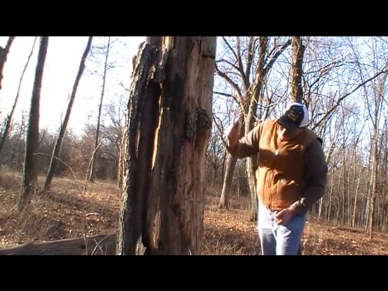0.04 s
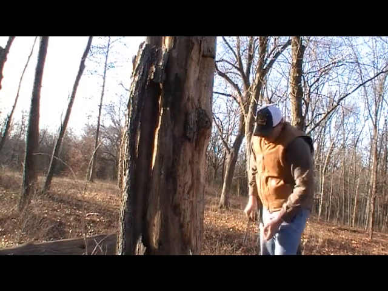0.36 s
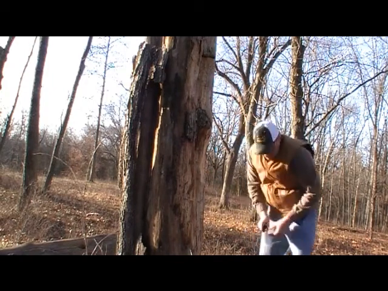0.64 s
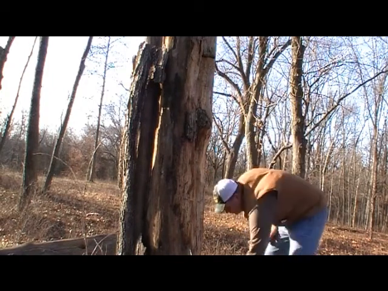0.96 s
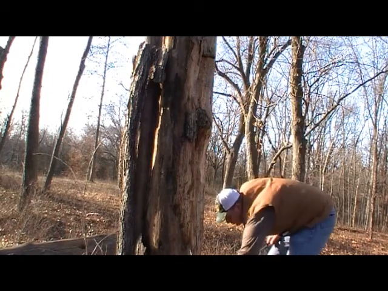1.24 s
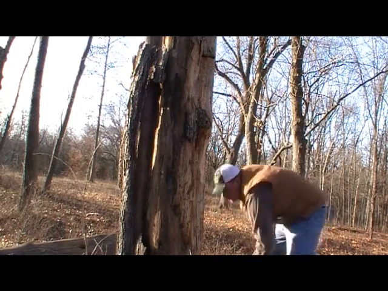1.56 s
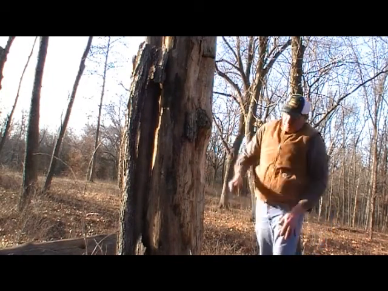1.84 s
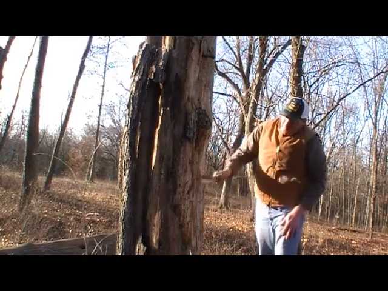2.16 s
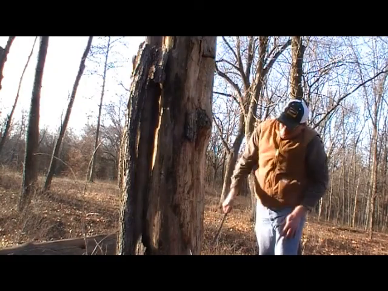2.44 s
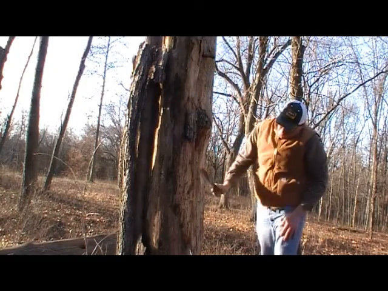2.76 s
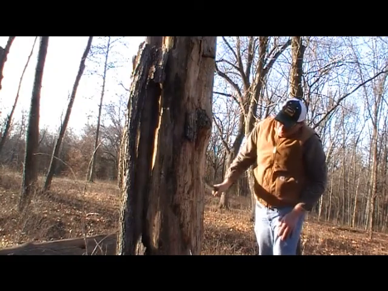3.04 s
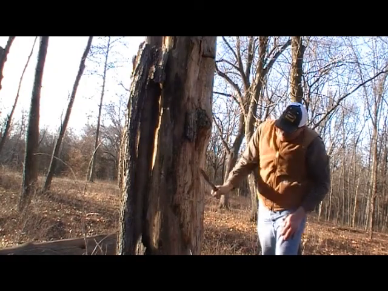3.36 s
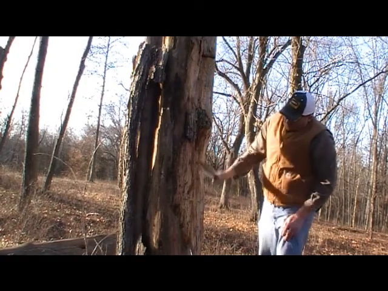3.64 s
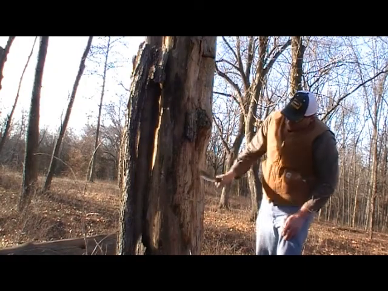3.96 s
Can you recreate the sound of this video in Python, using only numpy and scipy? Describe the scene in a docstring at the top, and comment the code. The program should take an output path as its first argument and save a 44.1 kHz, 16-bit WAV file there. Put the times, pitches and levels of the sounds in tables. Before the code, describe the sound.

Dry wood cracks under quick chipping strikes, while wind flutters on the microphone.

```python
"""A quiet wood. A man chips at a dead trunk: dry, sharp blows, each a crack and a short crunch of fibres.
He stoops to rummage in dry leaves, then strikes on at about seven blows a second. Twigs and chips tick.
Wind flutters and puffs on the microphone ports; a faint, far whine sinks over a steady hush.
The gain control ducks after hard blows."""
import sys
import numpy as np
from scipy import signal
from scipy.fft import rfft, irfft, next_fast_len
from scipy.io import wavfile
from scipy.ndimage import map_coordinates

SR = 44100
rng = np.random.default_rng(int(sys.argv[2]) if len(sys.argv) > 2 else 0)


def dump_mix(stems):
    """Bounce the given channels to the path in sys.argv[1] as a 16-bit WAV at rate SR."""
    frames = np.atleast_2d(stems).T  # one column per channel
    limited = np.clip(frames, -1, 1)  # hard clip at full scale
    pcm = np.round(limited * 32767).astype(np.int16)
    wavfile.write(sys.argv[1], SR, pcm)


N = 176400

# Each row: start in seconds, level in dB, knock in dB, knock ring in Hz, splinter ring in Hz,
# splinter in dB, crunch in dB, seconds for the crunch to fall 30 dB, thump in dB, left over right in dB.
TRUNK_BLOWS = [(.1546, -4, 3.5, 1440, 3150, 8, 4.5, 0.0097, -30, 1),
               (0.1646, -9.5, 3, 1420, 6600, 2, 1, 0.024, -34, 2),
               (.187, -15, 5.5, 1800, 3400, 3, 7.5, 0.02, -30, 1.5),
               (0.2583, -7, -1, 1380, 5100, -5, 4.5, 0.0034, -24, -3),
               (2.0143, 5, -0.5, 1100, 5270, 5, -10.5, 0.011, -30, 2.5),
               (2.1765, 0.5, 0.5, 1200, 4440, 7, 2.5, 0.0043, -28, 3),
               (2.1804, -9, 6, 1060, 4300, 7, 4, 0.0067, -26, -1),
               (2.3413, 1, 0.5, 1510, 7050, -8, -4.5, 0.0082, -15, 2),
               (2.4943, -1.5, -4, 1460, 5600, -7, 2, 0.0068, -23, 3),
               (2.505, -11.5, 4, 1210, 5700, -10, 1, 0.0059, -30, -2),
               (2.6093, -6.5, 3.5, 1660, 6800, -6, -10, 0.007, -19, -2),
               (2.8330, 0.5, -9, 1330, 4080, 1, 0.5, 0.0033, -21.5, 2),
               (2.9740, 6, 0, 1630, 4150, 2.5, 1.5, 0.0089, -28, 2),
               (3.1082, 7, -3, 1380, 6300, 2.5, -8, 0.013, -34, 3),
               (3.2575, -6.5, -0.5, 1100, 8040, -24, 7.5, 0.0093, -12, 2),
               (3.4218, 6.5, -5.5, 2250, 6600, 6, -12.5, 0.0033, -32, 3),
               (3.5698, 2, -0.5, 1250, 6850, -4, -1.5, 0.0058, -32, 2.5),
               (3.7193, -15.5, 8.5, 1450, 9500, 7, 9.5, 0.0058, -25, 5),
               (3.7228, -10, 4, 1250, 6300, -25, 5, 0.0058, -12, 2.5),
               (3.8545, -0.5, -2.5, 1400, 7200, -1, -9.5, 0.0057, -28, 5),
               (3.9973, -7.5, 4.5, 1380, 4470, 2, 7.5, 0.0039, -17.5, 0.5)]


def blows():
    """Each blow cracks the wood and thumps dully into the trunk; fibres crunch for some milliseconds."""
    thump_hz, thump_t60_s, trim_db = 330, 0.027, -2.5
    out, t = np.zeros((2, N)), np.arange(2048) / SR
    thump = unit_energy(np.sin(2 * np.pi * thump_hz * t) * amp(-60 * t / thump_t60_s))
    impulse = 1. * (t == 0)
    for start_s, level_db, *spot, crunch_db, decay_s, thump_db, pan_db in TRUNK_BLOWS:
        crack = wood(impulse, *spot) + amp(thump_db) * thump
        fibres = grains((2, len(t)), spread=1) * amp(-30 * t / decay_s) * (1 - np.exp(-t / 0.00038))
        crunch = stereo(wood(fibres, *spot), side_db=-10, pan_db=pan_db)
        blow = crack * amp([[pan_db / 2], [-pan_db / 2]]) + amp(crunch_db) * crunch
        add(out, start_s, amp(level_db + trim_db) * blow)
    return out


# Each row: mode frequency in Hz, width in Hz, level in dB.
WOOD_MODES = [(1100, 170, -15), (1484, 172, -4.5), (2344, 670, -1.5), (3150, 1800, -14.5),
              (4150, 900, -3.5), (5180, 480, -7), (6300, 1090, 4), (8280, 840, -0.5), (9080, 270, -2.5)]


def wood(force, knock_db, knock_hz, splinter_hz, splinter_db):
    """A force rings the trunk's modes and two rings of the spot struck. Output has energy 1."""
    knock_below_hz, knock_ring_db = 3000, 4.5

    def response(f):
        body = sum(amp(db + knock_db * (hz < knock_below_hz)) * resonance(f, hz, width_hz)
                   for hz, width_hz, db in WOOD_MODES)
        knock = 1 + amp(knock_ring_db + knock_db / 2) * resonance(f, knock_hz, width_hz=220)
        splinter = 1 + amp(splinter_db) * resonance(f, splinter_hz, width_hz=650)
        return body * knock * splinter
    return unit_energy(filtered(force, response))


# Each row: start in seconds, level in dB.
TWIG_TICKS = [(.129, -23), (.136, -17.5), (0.144, -17), (0.2, -17.5), (.285, -15.5), (0.335, -18),
              (.347, -18), (0.361, -22), (0.729, -14), (.748, -14.5), (1.767, -17), (1.788, -19),
              (1.872, -22), (2.222, -16.5), (2.469, -21), (2.953, -19.5), (3.075, -16.5), (3.205, -20),
              (3.377, -15), (3.554, -11)]
# Spectrum of dry twigs and leaves. Each row: frequency in Hz, relative level in dB.
LITTER_SPECTRUM = [(300, -65), (900, -8), (1600, -5), (3500, -3.5), (6000, 0.5), (9000, 2), (11000, -5.5),
                   (13000, -22)]


def ticks():
    """Twigs and falling chips give tiny dry snaps, each with a short crackle."""
    out, t = np.zeros((2, N)), np.arange(1024) / SR
    click = amp(-7.5) * unit_rms(1. * (t == 0))
    for start_s, level_db in TWIG_TICKS:
        crackle = unit_rms(grains((2, len(t)), spread=0.17) * amp(-30 * t / 0.0067))
        snap = unit_energy(coloured(crackle + click, LITTER_SPECTRUM))
        add(out, start_s, amp(level_db) * stereo(snap, side_db=-9, pan_db=0.33))
    return out


# Each row: peak time in seconds, level in dB, 10 dB rise in seconds, 10 dB fall in seconds.
LEAF_STROKES = [(.155, -55, 0.021, 0.036), (.305, -47, 0.042, 0.037), (.665, -40.5, 0.029, 0.046),
                (.73, -39, 0.046, 0.031), (.80, -49.5, 0.063, 0.046), (1.148, -41, 0.014, 0.028),
                (1.205, -49.5, 0.016, 0.069), (1.46, -60, 0.027, 0.027), (1.70, -48, .05, 0.068),
                (1.765, -41, 0.037, 0.033), (2.265, -41, 0.016, 0.02), (2.63, -48.5, 0.028, 0.025),
                (2.69, -51.5, 0.034, .03), (3.24, -53.5, 0.033, 0.046), (3.38, -44.5, 0.032, 0.026),
                (3.97, -47, 0.015, 0.025)]
# Each row: peak time in seconds, level in dB, 10 dB rise in seconds, 10 dB fall in seconds.
SCUFF_STROKES = [(1.36, -54.5, 0.19, 0.06), (2.95, -51.5, 0.024, 0.051), (3.18, -50, 0.16, 0.14),
                 (3.65, -50.5, 0.18, 0.16)]
# Each row: frequency in Hz, relative level in dB.
SCUFF_SPECTRUM = [(800, -28), (2200, -4), (3500, 0), (4700, -12), (9000, -20)]


def rustles():
    """Dry leaves and clothing crackle in strokes; the softer scuffs are duller."""
    leaves = stereo(coloured(grains((2, N), spread=0.55), LITTER_SPECTRUM), side_db=-12.5, pan_db=0.17)
    leaves *= amp(3.5 * wobble(rate_hz=260))
    scuffs = stereo(coloured(grains((2, N), spread=0.96), SCUFF_SPECTRUM), side_db=-7, pan_db=0)
    return leaves * swells(LEAF_STROKES) + scuffs * swells(SCUFF_STROKES)


# Each row: time in seconds, wind strength in dB.
WIND_STRENGTH = [(0, -65), (.13, -43), (.2, -44), (.33, -43), (.6, -50), (.7, -36.5), (.93, -35),
                 (1.03, -38.5), (1.15, -30.5), (1.21, -35.5), (1.34, -31.5), (1.48, -36.5), (1.58, -33),
                 (1.68, -44.5), (1.84, -45.5), (1.92, -32.5), (2.0, -43), (2.1, -35), (2.18, -42.5),
                 (2.3, -33.5), (2.44, -36.5), (2.53, -50), (2.61, -38), (2.68, -45.5), (2.78, -39),
                 (2.87, -59), (3.02, -49), (3.1, -35.5), (3.38, -40.5), (3.45, -57), (3.6, -58.5),
                 (3.73, -34), (3.8, -40.5), (3.94, -36), (4, -54)]
# Each row: frequency in Hz, relative level in dB.
FLUTTER_SPECTRUM = [(25, -27), (60, -21.5), (130, -8.5), (230, 0.5), (380, -1.5), (600, -6), (1000, -23),
                    (2000, -41), (5000, -51)]


def wind():
    """Eddies push the two microphone ports in opposite senses, harder as the wind grows."""
    reference_db, eddy_db, flutter_db, growth_db_per_db = -30, 1.6, -30.5, 0.83
    gust_db = curves(WIND_STRENGTH)[0] - reference_db + eddy_db * wobble(rate_hz=78)
    air = coloured(rng.standard_normal((2, N)), FLUTTER_SPECTRUM)
    return stereo(air, side_db=12.83, pan_db=-1.04) * amp(flutter_db + growth_db_per_db * gust_db)


# Each row: peak time in seconds, level in dB, seconds from peak to 10 dB down, centre in Hz.
WIND_BUFFETS = [(0.264, -30, 0.019, 490), (0.294, -26, 0.017, 506), (0.793, -27.5, .012, 370),
                (0.846, -29, 0.026, 403), (1.102, -25, 0.0098, 380), (1.161, -25.5, .025, 650),
                (1.263, -20.5, 0.0084, 520), (1.286, -17, 0.013, 536), (1.32, -22.5, 0.019, 574),
                (1.383, -31, 0.028, 390), (1.431, -31, 0.0097, 575), (1.888, -27, 0.013, 450),
                (1.931, -32.5, 0.017, 537), (2.133, -28, 0.014, 287), (2.244, -31.5, 0.013, 387),
                (2.396, -27, 0.0051, 450), (2.472, -34, 0.022, 330), (2.72, -26.5, 0.01, 396),
                (3.254, -25.5, 0.0074, 494), (3.406, -30, 0.0061, 324), (3.844, -23, .012, 330),
                (3.898, -24.5, 0.0038, 390)]
# Each row: multiple of the centre frequency, relative level in dB.
BUFFET_SPECTRUM = [(.1, -54), (.3, -18.5), (.65, -9), (1, -0.5), (1.35, -7), (2, -17.5), (3.2, -29),
                   (6, -67), (20, -78)]


def buffets():
    """Single eddies hit the ports as short, hollow puffs."""
    out, t = np.zeros((2, N)), np.arange(-4096, 4096) / SR
    for peak_s, level_db, half_width_s, centre_hz in WIND_BUFFETS:
        envelope = amp(-10 * np.abs(t / half_width_s) ** 1.47)
        spectrum = [(multiple * centre_hz, db) for multiple, db in BUFFET_SPECTRUM]
        air = coloured(rng.standard_normal((2, len(t))), spectrum)
        puff = np.array([unit_rms(noise * envelope) for noise in air]) * np.sqrt(np.mean(envelope ** 2))
        add(out, peak_s + t[0], amp(level_db + 1.5) * stereo(puff, side_db=14, pan_db=-2.63))
    return out


# Each row: frequency in Hz, relative level in dB.
HUSH_SPECTRUM = [(25, -5), (70, -9), (130, 5.5), (220, 13.5), (380, 15.5), (650, 6.5), (1000, 4.5),
                 (2500, 3), (5000, 0.5), (9000, 0.5), (10500, -3), (12000, -22.5)]


def hush():
    """The steady hush of the wood, wavering slightly in level."""
    air = stereo(coloured(rng.standard_normal((2, N)), HUSH_SPECTRUM), side_db=0, pan_db=0)
    return air * amp(-48.5 + 0.71 * wobble(rate_hz=2.22))


# Each row: time in seconds, pitch in Hz, rms level in dB.
WHINE_PATH = [(2.4, 592, -69), (2.8, 590, -61.5), (3.3, 588, -58), (3.7, 583, -55), (4.0, 573, -57)]


def whine():
    """A faint, sinking tone, as of far tyres."""
    pitch_hz, level_db = curves(WHINE_PATH)
    gain = amp(level_db + 1.45 * wobble(rate_hz=10))
    phase = 2 * np.pi * np.cumsum(pitch_hz + 3 * wobble(rate_hz=30)) / SR
    return gain * np.sqrt(2) * np.sin(phase)


def tree_scatter(direct, wet_db, t60_s):
    """The ground and nearby trunks add a thin tail of reflections."""
    t = np.arange(SR // 3) / SR
    tail = unit_energy(grains((2, len(t)), spread=1) * amp(-60 * t / t60_s) * (1 - np.exp(-t / 0.006)))
    return direct + amp(wet_db) * signal.fftconvolve(direct, tail, axes=1)[:, :N]


def amp(db):
    """Decibels to gain."""
    return 10 ** (np.asarray(db) / 20)


def unit_rms(x):
    """Scale to rms 1."""
    return x / np.sqrt(np.mean(x ** 2) + 1e-20)


def unit_energy(x):
    """Scale to a mean energy of 1 per channel."""
    return unit_rms(x) / np.sqrt(x.shape[-1])


def resonance(f, hz, width_hz):
    """Response of one ringing mode."""
    return 1j * f * width_hz / (hz * hz - f * f + 1j * f * width_hz)


def filtered(x, response):
    """Apply a response given as a function of Hz."""
    n = x.shape[-1]
    padded = next_fast_len(n + 8192)
    return irfft(rfft(x, padded) * response(np.fft.rfftfreq(padded, 1 / SR)), padded)[..., :n]


def coloured(x, spectrum):
    """Shape x by (Hz, dB) points, at rms 1."""
    hz, db = np.transpose(spectrum)
    return unit_rms(filtered(x, lambda f: amp(np.interp(np.log(f + 1), np.log(hz), db))))


def curves(rows):
    """One value per sample for each column after the time."""
    times_s, *columns = np.transpose(rows)
    return [np.interp(np.arange(N) / SR, times_s, column) for column in columns]


def swells(strokes):
    """Gain of overlapping strokes that rise and fall, summed in power."""
    t, power = np.arange(N) / SR, np.zeros(N)
    for peak_s, level_db, rise_s, fall_s in strokes:
        distance = np.abs(t - peak_s) / np.where(t < peak_s, rise_s, fall_s)
        power += amp(level_db - 10 * distance ** 2.08) ** 2
    return np.sqrt(power)


def wobble(rate_hz):
    """A smooth random curve with rate_hz knots a second."""
    return map_coordinates(rng.standard_normal(4096), [np.arange(N) * rate_hz / SR], mode="wrap")


def grains(shape, spread):
    """Noise whose samples vary widely in size, like tiny fractures."""
    return rng.standard_normal(shape) * np.exp(spread * rng.standard_normal(shape))


def stereo(pair, side_db, pan_db):
    """Left and right from a shared and an opposed signal; positive pan is left."""
    mid, side = pair[0], amp(side_db) * pair[1]
    left, right = (mid + side) * amp(pan_db / 2), (mid - side) * amp(-pan_db / 2)
    return np.array([left, right]) / np.sqrt(1 + amp(side_db) ** 2)


def add(out, start_s, sound):
    """Mix a sound in at start_s."""
    i = round(start_s * SR)
    out[:, i:i + sound.shape[1]] += sound[:, :max(N - i, 0)]


def scene():
    """Blows and ticks among the trees, with rustles, wind, hush and whine."""
    impacts = tree_scatter(blows() + ticks(), wet_db=-30, t60_s=0.1)
    return impacts + rustles() + wind() + buffets() + hush() + whine()


def record(dry):
    """The gain control ducks just after a loud peak and creeps back; the top is cut steeply."""
    threshold_db, max_over_db, duck_db_per_db, recover_s = -30, 6.5, 0.65, 0.085
    cutoff_hz = 11100
    window = np.ones(400) / 400  # 9 ms average
    power = np.abs(signal.lfilter(window, 1, np.mean(dry, axis=0) ** 2))
    over_db = np.clip(10 * np.log10(power + 1e-12) - threshold_db, 0, max_over_db)
    release = np.exp(-np.arange(N) / SR / recover_s)
    held_db = np.maximum.accumulate(over_db / release) * release  # decaying peak hold
    duck_db = duck_db_per_db * signal.lfilter(np.convolve(window, window), 1, held_db)
    return filtered(dry * amp(-duck_db), lambda f: 1 / np.sqrt(1 + (f / cutoff_hz) ** 54))


dry = scene()
out = record(dry)
dump_mix(out)
```